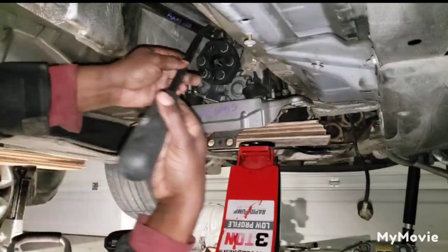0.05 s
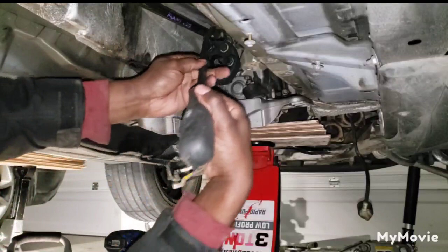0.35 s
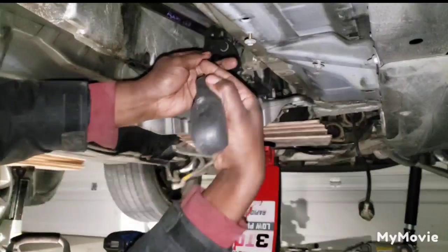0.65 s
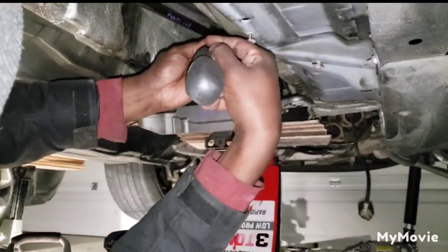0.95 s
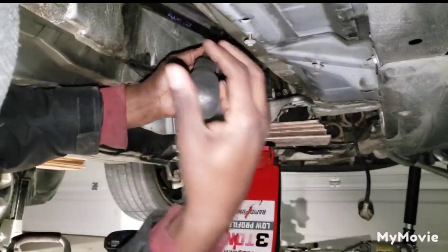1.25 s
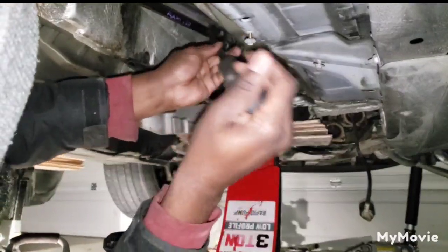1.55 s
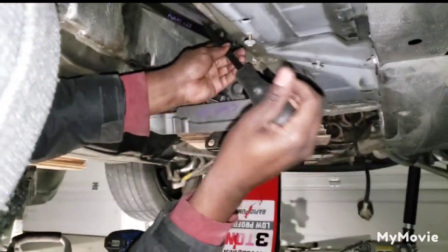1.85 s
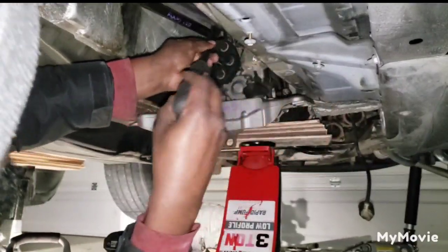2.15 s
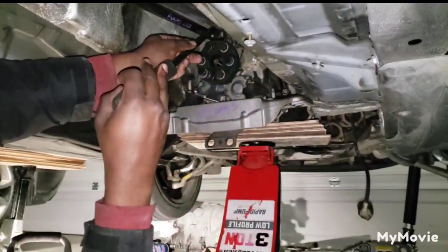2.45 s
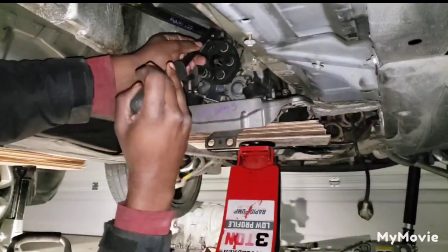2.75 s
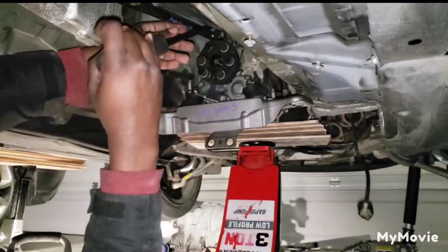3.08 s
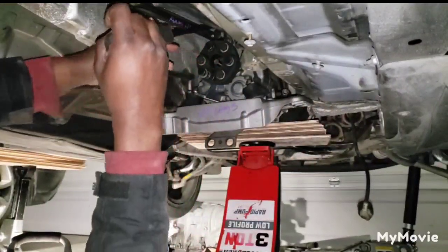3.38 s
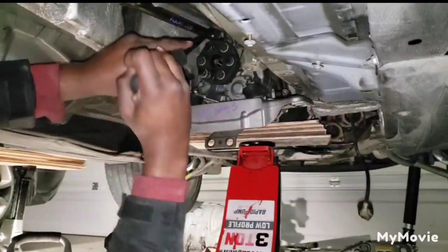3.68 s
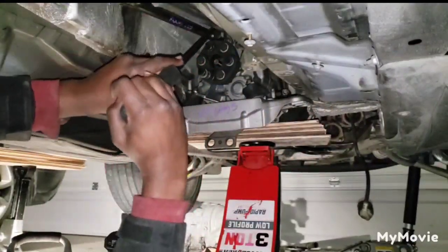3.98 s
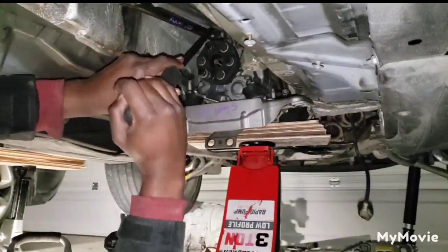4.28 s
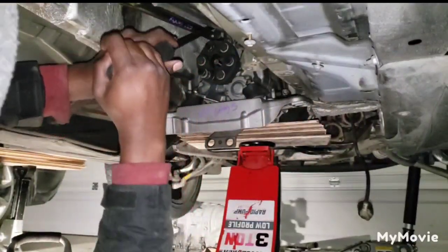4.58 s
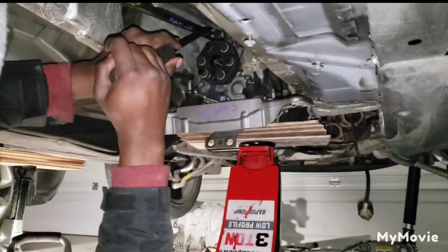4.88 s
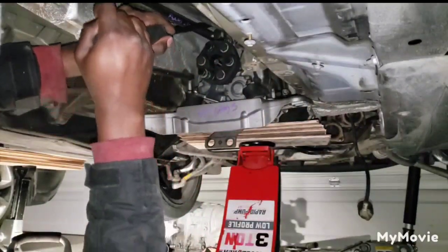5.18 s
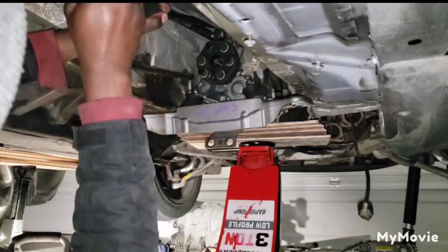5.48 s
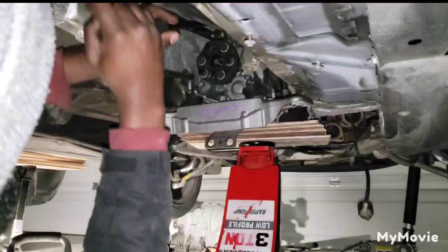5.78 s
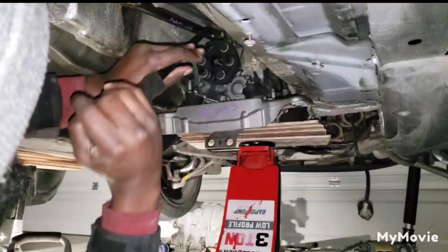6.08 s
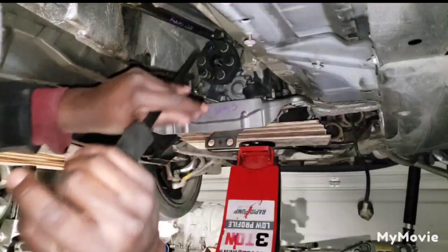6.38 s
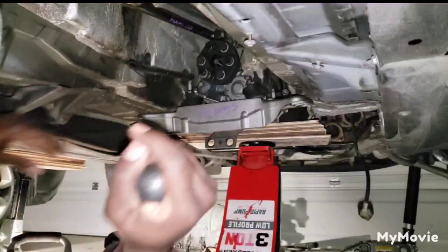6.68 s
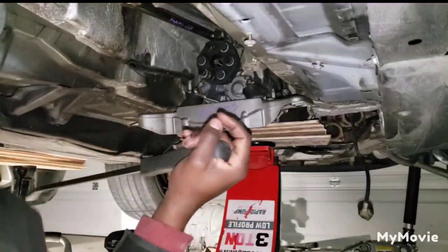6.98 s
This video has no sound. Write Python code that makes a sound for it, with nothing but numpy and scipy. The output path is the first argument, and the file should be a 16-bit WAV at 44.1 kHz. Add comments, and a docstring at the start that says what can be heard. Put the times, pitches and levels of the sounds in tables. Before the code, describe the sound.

A steel pry bar is worked against a coupling under a car in a quiet garage with a brief echo. Short, gritty scrapes end in sharp, ringing clanks at about 0.4 and 0.8 seconds, each with a faint low boom from the shaft. Another scrape with a faint, very high squeak leads to a clank at 1.8 seconds, then a quick cluster, loudest near 2.1. From 2.3 to 5.7 seconds it is quieter: dull bumps, light ticks, one short rub near 3.2 and a knock near 4.4. A thump at 5.9 starts a loud run of clanks and scrapes, and at 6.3 the bar slips free and rings for about half a second. Jacket sleeves swish softly beside the microphone throughout, fuller after 5 seconds and strongest near the end at 7 seconds, with a little low air rumble.

```python
"""Prying under a car

In a garage, a pry bar is worked by hand against a drive-shaft coupling. Its steel tip scrapes, slips
and clanks, making the metal ring. Dull bumps come from the underbody, cloth and hands, and the garage
echoes briefly. Jacket sleeves swish right beside the microphone as the arms move."""
import sys
import numpy as np
from scipy import signal
from scipy.fft import rfft, irfft
from scipy.io import wavfile

SR = 44100
rng = np.random.default_rng(int(sys.argv[2]) if len(sys.argv) > 2 else 0)


def digitize_waveform(pressure):
    """Quantize a signal to 16-bit integers and store it at the path in sys.argv[1].

    Rows of a 2-D input are taken as channels; values are limited to [-1, 1].
    """
    field = np.atleast_2d(pressure).T
    bounded = np.clip(field, -1, 1)
    quanta = np.round(bounded * 32767).astype(np.int16)
    wavfile.write(sys.argv[1], SR, quanta)


N = 319284
TIME = np.arange(N) / SR
BAND_EDGES_HZ = np.geomspace(22, 17000, 24)
BAND_HZ = np.sqrt(BAND_EDGES_HZ[1:] * BAND_EDGES_HZ[:-1])

# Levels in all tables are relative: the functions add their own gains.
# The tip hits the coupling. Each row: start in seconds, level near 2 kHz in dB,
# crack near 6 kHz in dB above that level, length in milliseconds.
TIP_CLANKS = [(0.363, -27.5, -10.5, 6), (0.815, -25, 3, 6.5), (1.094, -48.5, -8, 5), (1.612, -62.5, -2, 15),
              (1.7922, -27.5, -23.5, 5.2), (1.973, -40, -14.5, 11), (2.053, -48.5, -21, 3.5),
              (2.073, -21.5, -8.5, 4.1), (2.131, -36, -20, 6.5), (2.218, -44, -21, 17),
              (2.495, -61.5, -1.5, 15), (3.014, -41.5, -4.5, 4.5), (3.881, -47.5, -8.5, 5.8),
              (4.116, -61, -3, 4.5), (5.055, -56, 0, 10.6), (5.968, -37, -1, 12), (5.983, -34, -6, 14),
              (6.079, -23.5, -1.5, 6), (6.231, -36, 0, 18.6), (6.299, -21.5, -7.5, 7.1)]
# Dull bumps and low rubs: the bar on the underbody, and cloth or hands near the microphone.
# Each row: start in seconds, level near 500 Hz in dB, ring near 2 kHz in dB above that level,
# length in milliseconds.
DULL_BUMPS = [(1.226, -57, -19, 7), (1.425, -69.5, 6, 25), (2.327, -51.5, 0, 26), (2.402, -57, 3, 12.4),
              (2.443, -61.5, 2, 13), (2.764, -61.5, 10.5, 22), (2.799, -49.5, 4.5, 16),
              (3.001, -59, 5.5, 48), (4.449, -44.5, 9.5, 8.5), (5.862, -34, -5, 11), (5.92, -59, 12.5, 43),
              (7.114, -52, 3, 6.1)]
LOW_RUBS = [(3.744, -66, 0.5, 167), (3.93, -71, 2, 110)]
# The tone of every hit. Each row: frequency in Hz, level in dB.
HIT_TONE = [(30, -20.5), (110, 3.5), (300, -1), (600, 6), (1000, -4.5), (2000, -3.5), (4000, -1.5),
            (6300, -7), (8500, -10.5), (12000, -17), (16000, -62)]
# How bar and coupling ring together. Each row: pitch in Hz, width in Hz,
# level in dB with the tip loose, level in dB with it seated.
STEEL_RINGS = [(351, 38, -1.5, -24.5), (406, 13, -0.5, 0), (507, 110, -5.5, -12.5), (821, 26, 0, 9.5),
               (1193, 23, -23, -1), (1559, 74, 3, 7), (1936, 41, 0, -1), (2357, 91, 5.5, -2.5),
               (2675, 52, -2.5, 3), (3130, 54, 10, -2.5), (3381, 51, -0.5, 2), (4064, 72, 8.5, -4.5),
               (4477, 74, 8.5, -2.5), (5510, 120, 4.5, 8.5), (6440, 150, -3, 6), (8730, 67, -15.5, 9),
               (10020, 41, -4, 6.5)]
# How deep the tip sits. Each row: time in seconds, depth from 0 (loose) to 1 (seated).
TIP_DEPTH = [(0.37, 0.23), (0.82, 0.39), (1.8, 0.74), (2.0, 1), (4.4, 1), (5.86, 0.5), (6.0, 0.64),
             (6.3, 0.2)]
# The tip drags until it lets go. Each row: peak time in seconds, level in dB, rise in seconds.
TIP_SCRAPES = [(0.032, -54, 0.11), (0.35, -54, 0.081), (0.633, -49, 0.021), (0.70, -48.5, 0.033),
               (0.808, -39, .033), (1.70, -47.5, 0.038), (1.738, -46.5, .015), (1.794, -46.5, 0.023),
               (2.188, -47.5, 0.0069), (6.121, -35, 0.024), (6.21, -45.5, .06)]
# The notes of the dragged bar. Each row: pitch in Hz, width in Hz, level in dB.
SINGING_NOTES = [(1322, 40, 7), (2308, 45, 6), (3392, 31, 5)]
# The bar slips free. Each row: start in seconds, level in dB.
BAR_RELEASES = [(6.302, -51)]
# The notes of the free bar. Each row: pitch in Hz, level in dB, seconds to fade by 60 dB.
FREE_BAR_NOTES = [(560, -3, 0.67), (2525, 0, 0.16), (3470, 4, 0.43), (4150, -1, 0.72), (4500, 3.5, 0.66)]
# Slips jolt the drive shaft. Each row: start in seconds, level in dB.
SHAFT_JOLTS = [(0.363, -55), (0.817, -55)]
# The low notes of the shaft. Each row: pitch in Hz, width in Hz (wider dies sooner).
SHAFT_NOTES = [(112, 18), (152, 13), (245, 21), (390, 21)]
# The rings of the rubbed grip. Each row: pitch in Hz, width in Hz, level in dB.
GRIP_RINGS = [(740, 70, -7), (1082, 40, 7), (1190, 78, -6), (1485, 55, 4), (2720, 2900, -15)]
# Sleeve strokes. Each row: start in seconds, length in seconds, hiss in dB,
# fuller low part in dB above the hiss.
SLEEVE_SWISHES = [(0.27, 0.33, -53.5, -2.5), (0.762, 0.32, -50, -1.5), (1.057, 0.32, -49, -1),
                  (1.94, .4, -59, 6), (2.992, .17, -60.5, 3), (3.172, 0.32, -62.5, -4),
                  (3.584, 0.32, -56, -17), (3.866, 0.24, -53, -4.5), (4.258, 0.2, -55, -14),
                  (4.473, .29, -56, -1), (4.834, 0.17, -64, -9), (5.031, 0.27, -54, -4.5),
                  (5.217, 0.44, -47.5, -1.5), (5.728, 0.34, -49.5, -8.5), (6.048, 0.77, -55, 3),
                  (6.497, 0.92, -47, -1.5), (6.87, 0.31, -43, -12.5)]
# Faint rustle, and air pushed at the microphone. Each row: time in seconds, level in dB.
RUSTLE_LEVEL = [(0, -64), (1.55, -70.5), (2.5, -68.5), (2.65, -77.5), (3.55, -69), (4.2, -71.5), (4.8, -78),
                (7.24, -71.5)]
WIND_LEVEL = [(0, -78), (.9, -74), (2.5, -75), (3.3, -78.5), (4.1, -92.5), (4.7, -104.5), (5.4, -78.5),
              (6.5, -77), (7.24, -57)]
# The tones of cloth, pushed air, the quiet room and its echo. Each row: frequency in Hz, level in dB.
CLOTH_TONE = [(100, -10.5), (200, -11.5), (400, 0.5), (900, -2.5), (1300, 4), (2000, 4), (3200, 5.5),
              (4500, 2), (6300, 3), (8500, -2), (11000, 0.5), (15500, -8)]
WIND_TONE = [(22, -30), (35, -1), (50, 0.5), (80, -0.5), (130, -5.5), (250, -18.5), (600, -26.5)]
ROOM_TONE = [(25, -10.5), (60, 8.5), (200, -5), (450, -9), (1000, -15.5), (5000, -23), (15000, -21.5)]
ECHO_TONE = [(60, -9.5), (250, 6), (500, -2.5), (1000, -12), (3000, -15), (12000, -8)]
# How long the garage echoes. Each row: frequency in Hz, seconds to fade by 60 dB.
ECHO_FADE = [(100, 0.28), (500, 0.53), (2000, 0.57), (6000, 0.27), (14000, 0.077)]
# How alike left and right are for near and far sounds. Each row: frequency in Hz,
# likeness (0 is unrelated, 1 or more is almost the same, below 0 is partly opposite).
NEAR_STEREO = [(60, 1.1), (290, 0.66), (640, 0.26), (1400, 0.03), (3000, -0.21), (7000, 0)]
FAR_STEREO = [(100, 0.93), (500, 0.7), (1500, 0.11), (4000, 0.2), (10000, 0.05)]
# The microphone's balance. Each row: frequency in Hz, left level in dB above the right.
MIC_BALANCE = [(60, 5.5), (250, 3.5), (700, 2.5), (1400, -2), (2800, -2.5), (5000, -4.5), (6600, -9),
               (9000, 8), (15000, -3)]


def hits(bands, force_db, bass_lag_s, settle_db, settle_s, rise_share):
    """Rough surfaces chatter briefly at each clank, bump or rub, then settle more quietly."""
    # Clanks carry only a weak thud, and bumps only a little crack.
    clanks = [(s, db - 23, db, db + crack, ms) for s, db, crack, ms in TIP_CLANKS]
    bumps = [(s, db, db + ring, db + ring - 29.5, ms) for s, db, ring, ms in DULL_BUMPS + LOW_RUBS]
    power = np.zeros((len(BAND_HZ), N))
    t = TIME[:SR * 2 // 3]
    for start_s, thud_db, clank_db, crack_db, length_ms in clanks + bumps:
        rise_s, fall_s = np.array([rise_share, 1 - rise_share]) * length_ms / 1000
        chatter = np.exp(-2 * np.maximum(t - rise_s, 0) / fall_s)
        settling = from_db(settle_db) ** 2 * np.exp(-2 * t / settle_s)
        shape = np.minimum(t / rise_s, 1) ** 2 * (chatter + settling)
        tone_db = at_hz([(450, thud_db), (1400, clank_db), (3000, clank_db), (5500, crack_db)], BAND_HZ)
        start = int(start_s * SR)
        power[:, start:start + len(t)] += np.outer(from_db(tone_db) ** 2, shape)[:, :N - start]
    force = np.zeros((2, N))
    for band, hz, band_power in zip(bands, BAND_HZ, power):
        lag = int(bass_lag_s * SR / (1 + (hz / 300) ** 2))   # the heavy underbody follows late
        force += band * np.roll(np.sqrt(band_power), lag) * from_db(at_hz(HIT_TONE, hz))
    return from_db(force_db) * force


def ringing_steel(force, dull_db, ring_db):
    """A few clear notes stand out of a dull clatter; the depth of the tip sets how strong each is."""
    depth, rings = in_time(TIP_DEPTH), 0
    for k, (hz, width, loose_db, seated_db) in enumerate(STEEL_RINGS):
        drive = (1 - depth) * from_db(loose_db) + depth * from_db(seated_db)
        rings += (-1) ** k * resonate(force * drive, hz, width)
    return from_db(dull_db) * force + from_db(ring_db) * rings


def scraping_tip(bands, level_db, slip_db, grain_db, let_go_s):
    """The tip sticks and slips over finely rough steel, pressing harder until it lets go."""
    power = sum((from_db(db) * swell(s, rise_s, let_go_s)) ** 2 for s, db, rise_s in TIP_SCRAPES)
    tone = [(100, -15), (800, -7.5), (1300, 2.5), (3200, 1.5), (6000, -8), (9000, -10.5), (15000, -23)]
    roughness = from_db(level_db + slip_db * drift(90) + grain_db * drift(750))
    return np.sqrt(power) * shaped_noise(bands, tone) * roughness


def singing_bar(friction):
    """Scraping makes the bar bend and sing at a few of its own notes."""
    return friction + sum(from_db(db) * resonate(friction, hz, width) for hz, width, db in SINGING_NOTES)


def free_bar():
    """Once off the coupling, the bar rings longer, out of step between left and right."""
    ring = np.zeros((2, N))
    for start_s, release_db in BAR_RELEASES:
        t = np.maximum(TIME - start_s, 0)
        for hz, db, fade_s in FREE_BAR_NOTES:
            phase = rng.uniform(0, 2 * np.pi, (2, 1))
            fade = (t > 0) * from_db(-60 * np.minimum(t / fade_s, 2))
            ring += from_db(release_db + db) * fade * np.sin(2 * np.pi * hz * t + phase)
    return ring


def booming_shaft():
    """The heavy shaft takes up a blow slowly and booms."""
    boom = np.zeros(N)
    for start_s, db in SHAFT_JOLTS:
        t = np.clip(TIME - start_s, 0, 1)
        for hz, width in SHAFT_NOTES:
            age = np.pi * width * t
            note = np.sin(2 * np.pi * hz * t + rng.uniform(0, 2 * np.pi))
            boom += from_db(db) * age * np.exp(1 - age) * note
    return boom


def rubbing_grip(bands, level_db, grain_db):
    """The grip gives one dull rub: soft, grainy friction stirs a few rings."""
    friction = bands.sum(axis=0) * from_db(grain_db * drift(300))
    rings = sum(from_db(db) * resonate(friction, hz, width) for hz, width, db in GRIP_RINGS)
    return from_db(level_db) * swell(peak_s=3.245, rise_s=0.021, fall_s=0.044) * unit_level(rings)


def squeaking_tip(hz, width_hz, level_db):
    """Dry steel chatters at one unsteady, very high pitch as the tip slides home."""
    whistle = unit_level(resonate(rng.standard_normal((2, N)), hz, width_hz))
    return from_db(level_db) * swell(peak_s=1.785, rise_s=0.03, fall_s=0.025) * whistle


def arm_swing(start_s, length_s):
    """An arm starts from rest, reaches top speed (1) a little before halfway and stops again."""
    progress = np.clip((TIME - start_s) / length_s, 0, 1)
    return np.abs(np.sin(np.pi * progress ** 0.86)) ** 1.09


def sleeves(bands, hiss_db, body_db, weave_db, wind_db):
    """Cloth slides on cloth: a high hiss, a fuller body below it and a little wind on the microphone."""
    hiss_power = from_db(in_time(RUSTLE_LEVEL)) ** 2
    body_power = hiss_power.copy()
    for start_s, length_s, db, fullness_db in SLEEVE_SWISHES:
        power = (from_db(db) * arm_swing(start_s, length_s)) ** 2
        hiss_power += power
        body_power += power * from_db(fullness_db) ** 2
    tone = from_db(at_hz(CLOTH_TONE, BAND_HZ))
    treble_share = 1 / (1 + (5000 / BAND_HZ) ** 3)
    hiss = from_db(hiss_db) * np.sqrt(hiss_power) * np.tensordot(tone * treble_share, bands, 1)
    body = from_db(body_db) * np.sqrt(body_power) * np.tensordot(tone * (1 - treble_share), bands, 1)
    wind = from_db(in_time(WIND_LEVEL) + wind_db) * shaped_noise(bands, WIND_TONE)
    return (hiss + body) * from_db(weave_db * drift(250)) + wind


def narrow_gap(sound, hz, width_hz, ring_db):
    """The narrow space between the arms and the car's floor boosts one pitch."""
    return sound + from_db(ring_db) * resonate(sound, hz, width_hz)


def garage_echo(sound, build_s):
    """Many echoes blend, build up and die away, the highest pitches first."""
    t = TIME[:SR * 2 // 3]
    echo = 0
    for band, hz, width in zip(noise_bands(FAR_STEREO, len(t)), BAND_HZ, np.diff(BAND_EDGES_HZ)):
        build = 1 - np.exp(-(t / build_s) ** 2)
        fade = from_db(-60 * t / at_hz(ECHO_FADE, hz))
        gain = np.sqrt(2 * width / SR / len(t)) * from_db(at_hz(ECHO_TONE, hz))
        echo += gain * unit_level(band * build * fade)
    mono = sound.sum(axis=0, keepdims=True) / np.sqrt(2)
    return signal.fftconvolve(mono, echo, axes=1)[:, :N]


def room_air(bands, level_db):
    """The quiet garage is a steady low rumble with a faint hiss."""
    return from_db(level_db) * shaped_noise(bands, ROOM_TONE)


def from_db(db):
    """Turn decibels into a number to multiply by."""
    return 10 ** (np.asarray(db) / 20)


def unit_level(sound):
    """Scale a sound so its average (rms) level is 1."""
    return sound / np.sqrt(np.mean(sound ** 2) + 1e-20)


def in_time(rows):
    """Join (seconds, value) points into a curve with a value at every sample."""
    return np.interp(TIME, *np.transpose(rows))


def at_hz(rows, hz):
    """Read between (Hz, value) points, with octaves evenly spaced."""
    freqs, values = np.transpose(rows)
    return np.interp(np.log(hz), np.log(freqs), values)


def swell(peak_s, rise_s, fall_s):
    """A hand speeds up and slows down smoothly: a bell shape that peaks at 1."""
    distance = (TIME - peak_s) / np.where(TIME < peak_s, rise_s, fall_s)
    return np.exp(-np.minimum(distance ** 2, 60) / 2)


def drift(rate_hz):
    """A random wobble, about 1 in size."""
    points = rng.standard_normal(N // 20)
    return np.interp(TIME * rate_hz, np.arange(len(points)), points)


def resonate(sound, hz, width_hz):
    """Keep the sound near one pitch; a smaller width rings longer."""
    decay = np.exp(-np.pi * width_hz / SR)
    feed = np.array([1, 0, -1]) * (1 - decay ** 2) / 2
    feedback = [1, -2 * decay * np.cos(2 * np.pi * hz / SR), decay ** 2]
    return signal.lfilter(feed, feedback, sound + 1e-18)


def noise_bands(stereo, size=N):
    """Split white noise into bands from low to high, each with a left and a right side."""
    white, bands = rng.standard_normal((2, 2, size)), []
    for k, hz in enumerate(BAND_HZ):
        band_filter = signal.butter(2, BAND_EDGES_HZ[k:k + 2], "band", fs=SR, output="sos")
        mid, side = signal.sosfilt(band_filter, white[k % 2])
        alike = np.clip(at_hz(stereo, hz), -.99, .99)
        mid, side = np.sqrt((1 + alike) / 2) * mid, np.sqrt((1 - alike) / 2) * side
        bands.append([mid + side, mid - side])
    return np.array(bands)


def shaped_noise(bands, tone):
    """Mix noise bands to follow a tone of (Hz, dB) points, at an average level of 1."""
    return unit_level(np.tensordot(from_db(at_hz(tone, BAND_HZ)), bands, 1))


def scene():
    """Mix the steel work and its echo with the close sleeves and the quiet room."""
    far, near = noise_bands(FAR_STEREO), noise_bands(NEAR_STEREO)
    force = hits(far, force_db=13, bass_lag_s=0.0064, settle_db=-10.5, settle_s=0.019, rise_share=0.29)
    friction = singing_bar(scraping_tip(far, level_db=-4, slip_db=3, grain_db=2.5, let_go_s=0.017))
    work = ringing_steel(force + friction, dull_db=-1, ring_db=4.5) + free_bar()
    work += rubbing_grip(far, level_db=-48.5, grain_db=0.5)
    work += squeaking_tip(hz=13100, width_hz=120, level_db=-61)
    cloth = sleeves(near, hiss_db=1.5, body_db=1, weave_db=1, wind_db=3)
    cloth = narrow_gap(cloth, hz=1198, width_hz=34, ring_db=1.5)
    echo = garage_echo(work, build_s=0.0058)
    return work + echo + booming_shaft() + cloth + room_air(far, level_db=-73.5)


def record(dry):
    """Each microphone opening has its own tone and a treble dip; the deep bass and the top are cut."""
    balance_db = at_hz(MIC_BALANCE, np.maximum(np.fft.rfftfreq(N, 1 / SR), 1))
    sound = irfft(rfft(dry) * from_db(np.array([balance_db, -balance_db]) / 2), N)
    sound -= 0.55 * resonate(sound, hz=7300, width_hz=600)
    sound -= 0.55 * resonate(sound, hz=7900, width_hz=700)
    bass_cut = signal.butter(4, 34, "high", fs=SR, output="sos")
    top_cut = signal.ellip(10, .1, 80, 15480, fs=SR, output="sos")
    return signal.sosfilt(top_cut, signal.sosfilt(bass_cut, sound))


dry = scene()
out = record(dry)
digitize_waveform(out)
```